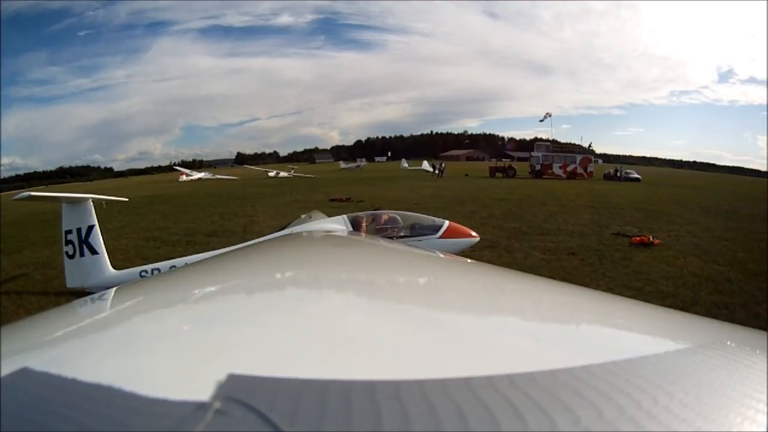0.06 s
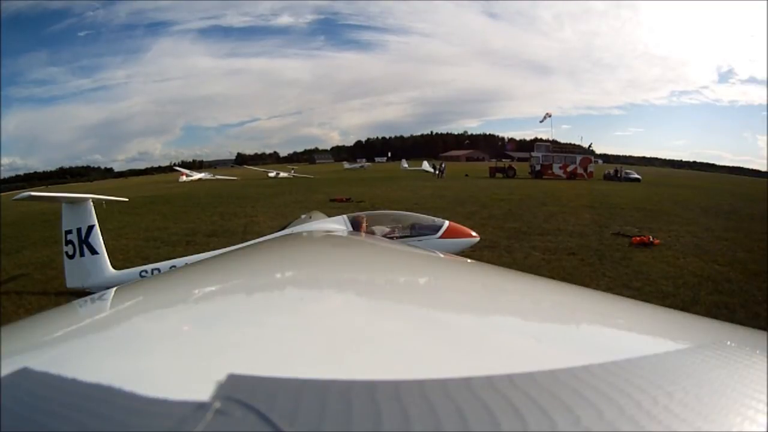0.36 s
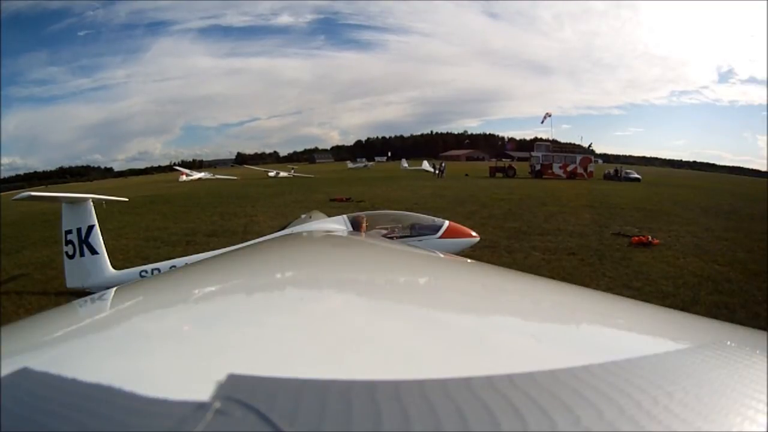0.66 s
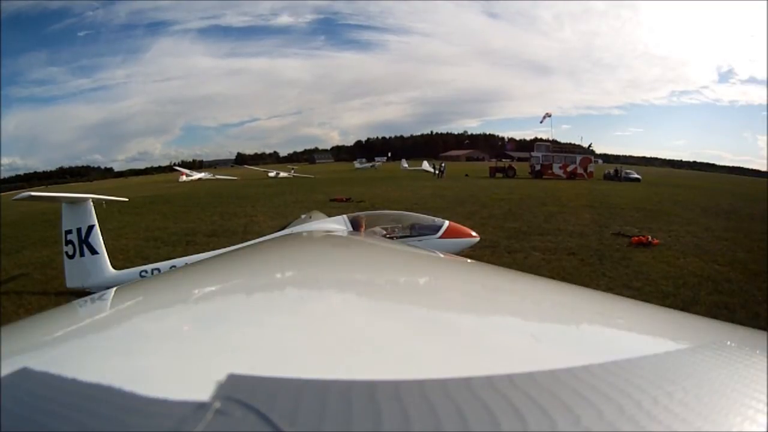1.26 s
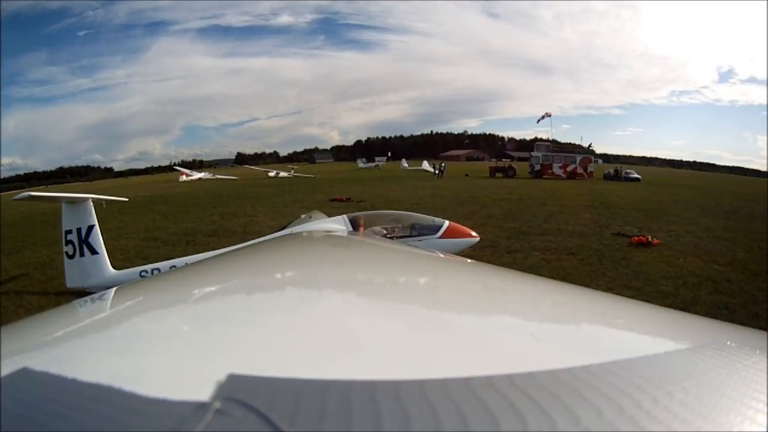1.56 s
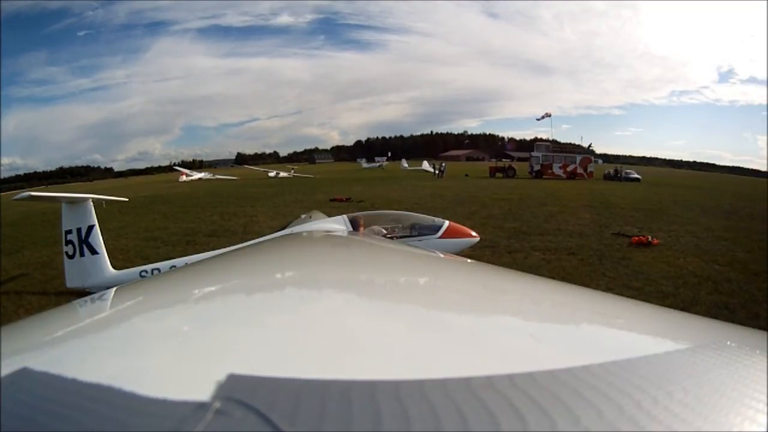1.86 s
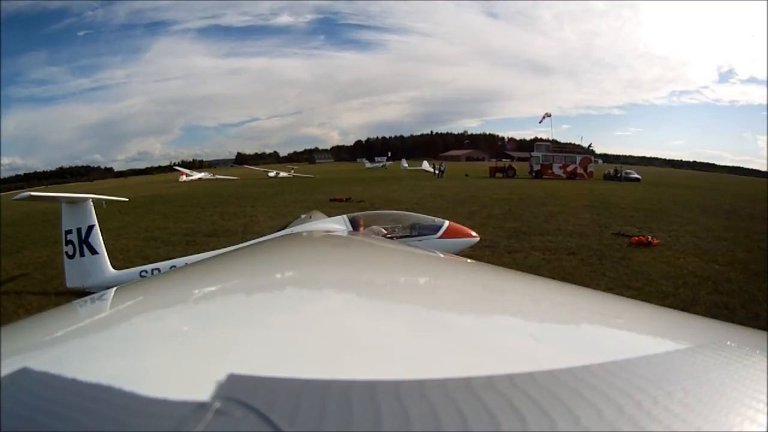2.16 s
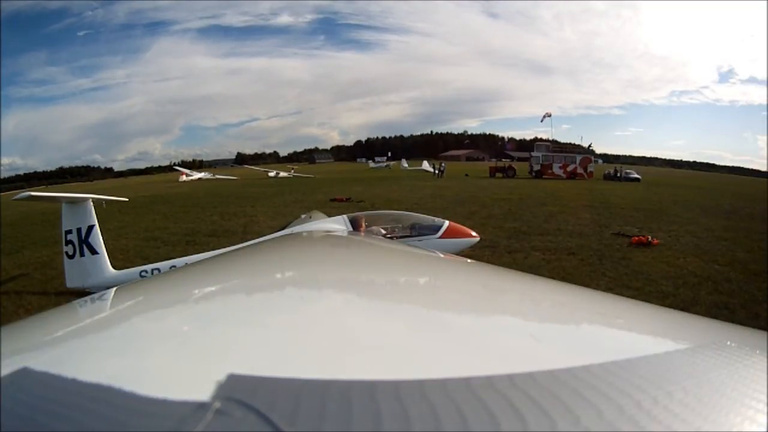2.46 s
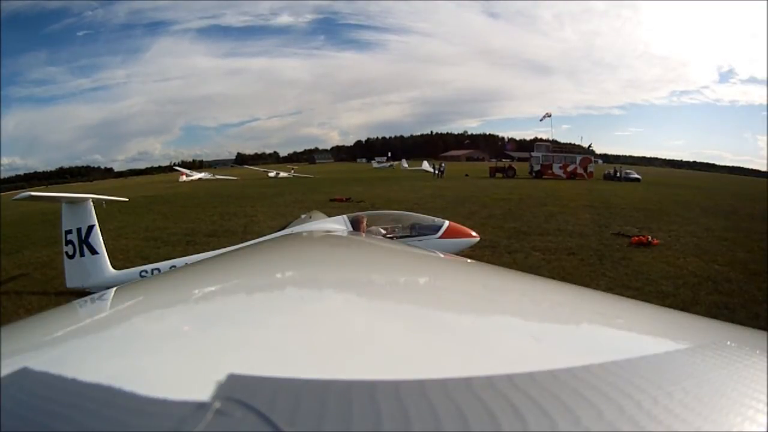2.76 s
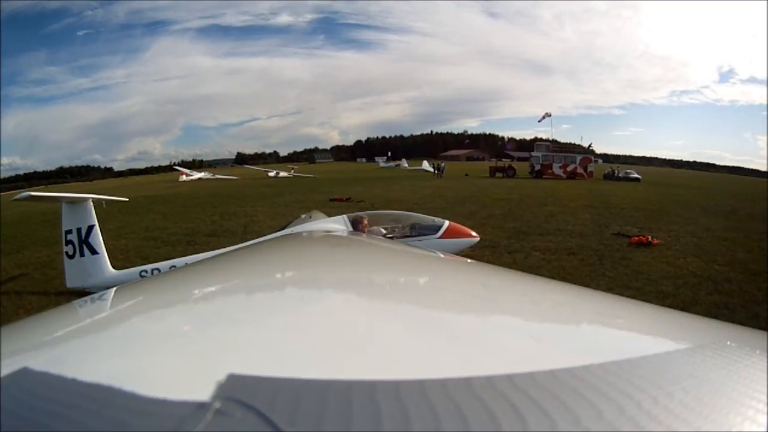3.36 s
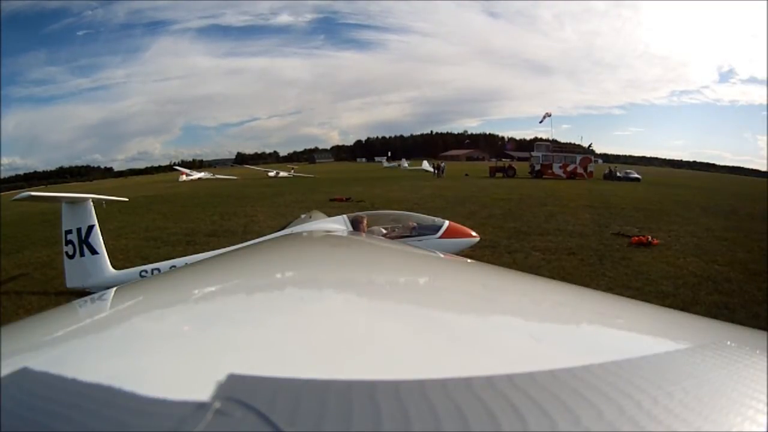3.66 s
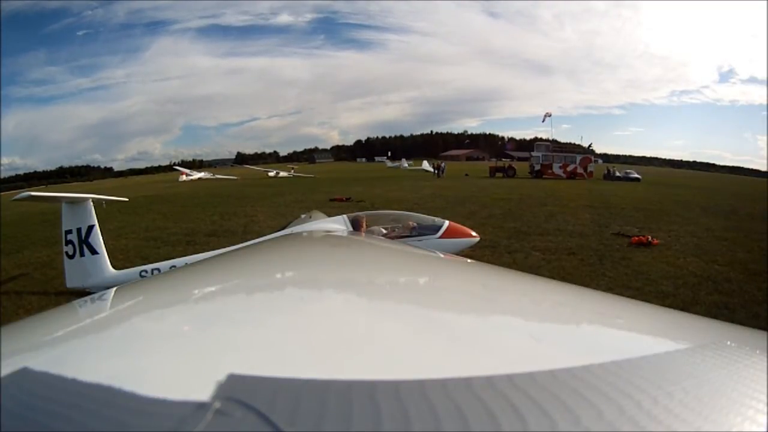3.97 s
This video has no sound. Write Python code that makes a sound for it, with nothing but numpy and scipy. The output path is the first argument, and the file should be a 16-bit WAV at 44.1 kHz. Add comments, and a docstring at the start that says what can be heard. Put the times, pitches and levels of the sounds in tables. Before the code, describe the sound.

Low, gusty wind rumbles directly on the microphone at an open airfield, with brief bumps and crackles. A far engine hums underneath and a bird twitters very faintly early on, before the wind turns stronger and raspier.

```python
"""Gusty wind buffets a camera microphone on a glider's wing, on an open grass airfield.
Turbulent pressure at the port rumbles, flutters and, in fast flow, rasps and crackles; large eddies
thump the diaphragm, and near-periodic vortex shedding throbs. Behind it the field hisses softly, a bird
twitters faintly and a far engine drones. The recorder's low sample rate adds a thin sizzle."""
import sys
import numpy as np
from scipy.fft import rfft, irfft, next_fast_len
from scipy.io import wavfile
from scipy.ndimage import map_coordinates

SR = 44100
rng = np.random.default_rng(int(sys.argv[2]) if len(sys.argv) > 2 else 0)


def dump_mix(stems):
    """Bounce the given channels to the path in sys.argv[1] as a 16-bit WAV at rate SR."""
    frames = np.atleast_2d(stems).T  # one column per channel
    limited = np.clip(frames, -1, 1)  # hard clip at full scale
    pcm = np.round(limited * 32767).astype(np.int16)
    wavfile.write(sys.argv[1], SR, pcm)


N = 176400
T = np.arange(N) / SR


def amp(db):
    """Decibels to gain."""
    return 10 ** (np.asarray(db) / 20)


def unit(x):
    """Scale to rms 1."""
    return x / np.sqrt(np.mean(x ** 2) + 1e-20)


def curves(rows):
    """One value per sample for each column after the time."""
    s, *cols = np.transpose(rows)
    return [np.interp(T, s, c) for c in cols]


def wobble(rate):
    """A smooth random curve, rate knots a second."""
    return map_coordinates(rng.standard_normal(int(N * rate / SR) + 4), [T * rate])


def filtered(x, response):
    """x times a response of frequency."""
    m = next_fast_len(N + SR // 4)
    return irfft(rfft(x, m) * response(np.fft.rfftfreq(m, 1 / SR)), m)[:N]


def noise(spectrum):
    """Noise of rms 1 with a (Hz, dB) spectrum."""
    hz, db = np.transpose(spectrum)
    response = lambda f: amp(np.interp(np.log(f + 1), np.log(hz + 1), db))
    return unit(filtered(rng.standard_normal(N), response))


def turbulent(spectrum, swirl, depth_db):
    """Noise of rms 1 that comes in bursts as eddies pass."""
    return unit(noise(spectrum) * amp(depth_db * swirl))


# Spectrum of the field's hiss: f/Hz, relative spectral density/dB
HISS_SPECTRUM = [(300, -4), (1500, -2), (2400, -4), (3000, -12.5), (3400, -9.5), (4300, -15), (5600, -17.5)]
# Envelope of the hiss: t/s, level/dB
HISS_LEVEL = [(0, -60.5), (1.4, -59), (1.7, -58.5), (2.0, -58), (2.4, -60), (2.87, -54.5), (3.1, -61.5),
              (3.6, -60), (4, -63)]
def field_hiss():
    """Slow amplitude modulation of broadband noise: the open field's hiss swells and sinks."""
    level_db, = curves(HISS_LEVEL)
    return amp(level_db) * noise(HISS_SPECTRUM)


# Notes of a distant bird: t/s, f/Hz, peak level/dB
BIRD_NOTES = [(.522, 4050, -64), (.553, 3950, -63), (.578, 4150, -61), (.603, 4000, -59), (.628, 3900, -70),
              (1.81, 3250, -58)]
def bird(half_width_s=0.0067, warble_hz=130):
    """Random frequency modulation makes each short, Gaussian tone pulse warble."""
    out = np.zeros(N)
    for s, hz, db in BIRD_NOTES:
        phase = 2 * np.pi * np.cumsum(hz + warble_hz * wobble(300)) / SR
        out += amp(db) * np.exp(-((T - s) / half_width_s) ** 2) * np.sin(phase)
    return out


# Drone of the far engine: t/s, firing rate f/Hz, rms level of the fundamental/dB
ENGINE_DRONE = [(0, 75.34, -23), (.5, 75.42, -26), (.7, 74.7, -22.5), (1.2, 74.9, -22.5),
                (2.1, 75.06, -22.5), (2.6, 74.8, -22.5), (3.3, 75.63, -22.5), (4, 75.5, -28.5)]
# Its harmonics: order, relative level/dB
FIRING_ORDERS = [(1, 0), (2, -12.5), (3, -30)]
def engine(drift_hz=0.29, waver_db=0.31):
    """Periodic firing gives a harmonic series; only low orders carry far, wavering in the moving air."""
    hz, db = curves(ENGINE_DRONE)
    phase = 2 * np.pi * np.cumsum(hz + drift_hz * wobble(8)) / SR
    out = np.zeros(N)
    for order, order_db in FIRING_ORDERS:
        peak = np.sqrt(2) * amp(db + order_db + waver_db * wobble(2.3))
        out += peak * np.sin(round(order) * phase + rng.uniform(0, 2 * np.pi))
    return out


# Spells of shedding: t/s, 1/e half-width/s, shedding rate f/Hz, nominal peak level/dB
SHEDDING_SPELLS = [(.94, 0.047, 171.6, -21), (2.8, 0.019, 182.6, -19), (2.936, 0.024, 155, -17.5),
                   (3.019, 0.013, 200.2, -19.5), (3.075, 0.023, 206.9, -16)]
def vortex_shedding(wander_hz=22.06, waver_db=2):
    """At the height of a gust, vortices shed almost periodically and the pressure throbs at that rate."""
    out = np.zeros(N)
    for s, half, hz, db in SHEDDING_SPELLS:
        phase = 2 * np.pi * np.cumsum(hz + wander_hz * wobble(60)) / SR
        envelope = np.exp(-((T - s) / half) ** 2)
        out += amp(db + waver_db * wobble(50)) * envelope * np.sin(phase)
    return out


# Large eddies striking the port: t/s, peak level of the pulse/dB, half the trough-to-crest time/s
LARGE_EDDIES = [(0.098, -7.5, 0.0016), (1.267, -10, 0.0019), (1.355, -15, 0.0034), (2.823, -9, 0.0011),
                (3.196, -14, 0.00096), (3.36, -10.5, 0.0012), (3.859, -12, 0.0029), (3.922, -13, 0.0023)]
# Spectrum of their crack: f/Hz, relative spectral density/dB
CRACK_SPECTRUM = [(300, 1.5), (900, 1), (2000, -18.5), (3500, -25.5), (5500, -33.5)]
def eddy_thumps(crack_relative_db=-24.5, crack_decay_s=0.0034):
    """A passing eddy is a bipolar pressure pulse: suction, then a push, with a small crack at the turn."""
    out = np.zeros(N)
    for s, db, half in LARGE_EDDIES:
        u = (T - s) / half
        pulse = u * np.exp((1 - u ** 2) / 2)
        crack_envelope = amp(crack_relative_db) * np.exp(-np.abs(T - s) / crack_decay_s)
        out += amp(db) * (pulse + crack_envelope * noise(CRACK_SPECTRUM))
    return out


# Short puffs: t/s, half-width/s, then gain/dB of buffet, flutter, rasp and crackle
PUFF_GAINS = [(.585, .015, 0, 2, 6, 2), (.659, .015, 2, 2, 7, 6), (.927, .03, 4, 4, 4, 17),
              (1.27, .014, 1, 3, 10, 12), (1.76, .014, 0, 4.5, 10, 8), (2.122, .01, 1, 2.5, 3, 3),
              (2.422, .017, 5, 3, 9, 16), (2.515, .014, 1, 7, 8, 9), (3.16, .015, 0, 1, 5, 0),
              (3.655, .006, 0, 0, 3, 8), (3.73, .024, 0, 0, 6, 10), (3.805, .018, 0, 2, 2, 3),
              (3.925, .014, 1, 1, 3, 4)]
def puffs():
    """Turbulence is intermittent: each puff gives the wind's layers a brief, flat-topped gain in dB."""
    return sum(np.outer(gains, np.exp(-((T - s) / half) ** 4)) for s, half, *gains in PUFF_GAINS)


# Gusts at the port: t/s, then base level/dB of low buffet, mid flutter and rasp
GUST_LEVELS = [(0, -27.5, -20.5, -36), (.06, -27, -27.5, -39.5), (.115, -29, -30.5, -48),
               (.15, -24, -23, -46), (.23, -27.5, -34.5, -46.5), (.4, -30.5, -33.5, -44.5),
               (.55, -32, -37, -48.5), (.7, -26, -31, -40.5), (.8, -25.5, -29.5, -51), (.93, -25, -25, -44),
               (1.02, -22, -26, -50.5), (1.15, -24, -30, -57.5), (1.24, -22, -27, -47),
               (1.33, -35.5, -36, -49.5), (1.38, -24, -30.5, -48), (1.45, -38.5, -44, -59.5),
               (1.5, -26, -27.5, -43), (1.57, -28, -30.5, -42), (1.7, -31, -31, -50),
               (1.85, -26.5, -31.5, -54), (1.96, -29.5, -33.5, -60), (2.12, -28.5, -30.5, -47),
               (2.28, -30, -34, -58), (2.38, -24.5, -30.5, -47.5), (2.47, -30, -32, -48.5),
               (2.56, -31, -30.5, -47), (2.62, -28, -36, -53), (2.68, -24.5, -27.5, -52.5),
               (2.76, -24, -31, -51.5), (2.82, -23, -31.5, -54), (2.93, -21, -27.5, -53.5),
               (3.07, -20, -27.5, -51), (3.17, -21.5, -27, -48.5), (3.3, -22, -29, -53),
               (3.38, -23, -25, -49.5), (3.5, -23.5, -32.5, -50.5), (3.62, -28.5, -26.5, -47),
               (3.7, -23.5, -24, -39), (3.78, -20.5, -27, -37), (3.86, -21, -25.5, -39),
               (4, -21, -25.5, -31.5)]
# Envelope of the treble crackle: t/s, base level/dB
CRACKLE_ENVELOPE = [(0, -52), (.07, -60.5), (.14, -71.5), (.7, -69), (1.1, -75), (1.42, -75), (1.57, -65),
                    (1.95, -73), (2.12, -66.5), (2.25, -72), (3.55, -76.5), (3.7, -65), (3.8, -60),
                    (3.87, -61.5), (3.92, -49), (3.96, -50), (3.99, -45)]
# Spectra of the wind's layers, low to high: f/Hz, relative spectral density/dB
RUMBLE_SPECTRUM = [(10, -16), (22, -8.5), (42, 1), (60, -1), (90, -7), (160, -34), (400, -83)]
BUFFET_SPECTRUM = [(40, -27), (80, 0), (120, 2.5), (200, 0.5), (290, -5.5), (450, -20.5), (900, -49.5),
                   (2500, -86.5)]
FLUTTER_SPECTRUM = [(120, -30.5), (250, -2), (370, 3), (520, -1), (700, -7.5), (950, -22), (1500, -43.5),
                    (4000, -67)]
RASP_SPECTRUM = [(300, -19), (600, -1), (900, 4), (1300, -5), (2000, -14.5), (3000, -30.5), (4200, -39.5),
                 (5600, -42.5)]
CRACKLE_SPECTRUM = [(800, -18.5), (1600, -5), (2500, 3), (3700, -1), (5500, -24)]
def wind():
    """Turbulent pressure at the port: gusts set the levels, small eddies chop the upper bands together."""
    base_db = np.array(curves(GUST_LEVELS) + curves(CRACKLE_ENVELOPE))
    buffet_db, flutter_db, rasp_db, crackle_db = base_db + puffs()
    rumble_db = -29.5 + 0.32 * (buffet_db - buffet_db.mean())  # partly follows the buffet's swings
    eddies = unit(wobble(190) + 0.84 * wobble(55))
    rumble = amp(rumble_db) * turbulent(RUMBLE_SPECTRUM, wobble(22), depth_db=2.0)
    buffet = amp(buffet_db - 0.24) * turbulent(BUFFET_SPECTRUM, eddies, depth_db=0.64)
    flutter_eddies = eddies + 0.6 * wobble(90)
    flutter = amp(flutter_db + 0.34) * turbulent(FLUTTER_SPECTRUM, flutter_eddies, depth_db=1.65)
    rasp = amp(rasp_db + 2.5) * turbulent(RASP_SPECTRUM, eddies, depth_db=2.5)
    crackle = amp(crackle_db) * turbulent(CRACKLE_SPECTRUM, eddies, depth_db=5.5)
    return rumble + buffet + flutter + rasp + crackle


def scene():
    """Superposition: the wind at the port adds to the faint sounds of the airfield, in one channel."""
    return (wind() + eddy_thumps() + vortex_shedding() + engine() + bird() + field_hiss())[None]


HOLD_HZ, ANTI_ALIAS_HZ, TOP_HZ = 12000, 5550, 15200
def record(dry):
    """Sample and hold mirrors the spectrum about the sampling rate and weights it with a sinc droop."""
    band_limited = filtered(dry[0], lambda f: 1 / np.sqrt(1 + (f / ANTI_ALIAS_HZ) ** 60))
    with_images = band_limited * (1 + 2 * np.cos(2 * np.pi * HOLD_HZ * T))
    return filtered(with_images, lambda f: np.sinc(f / HOLD_HZ) * (f < TOP_HZ))[None]


dry = scene()
out = record(dry)
dump_mix(out)
```